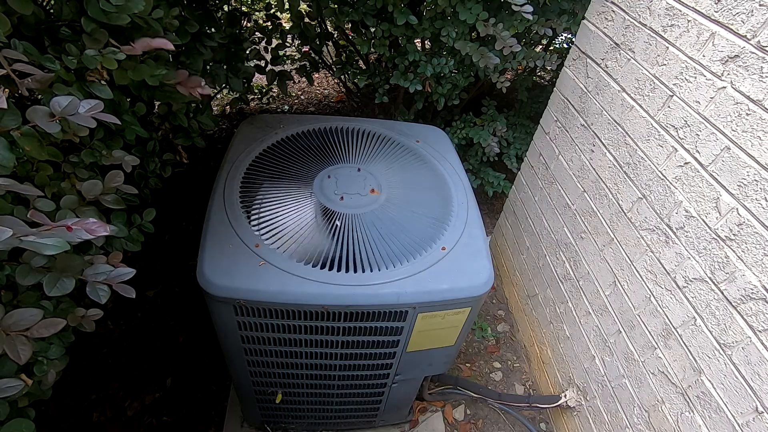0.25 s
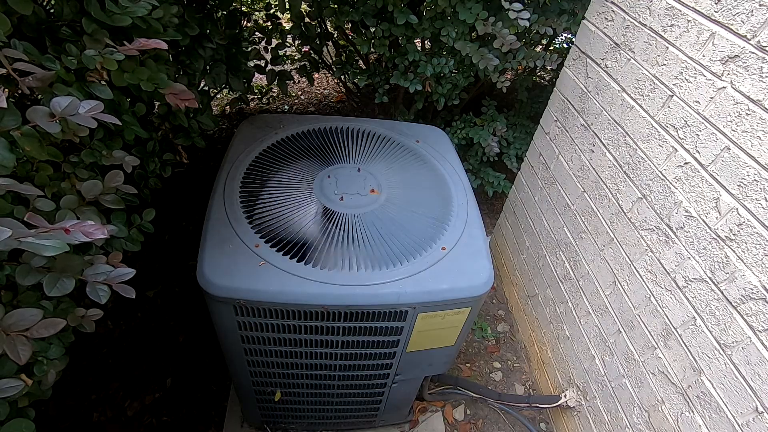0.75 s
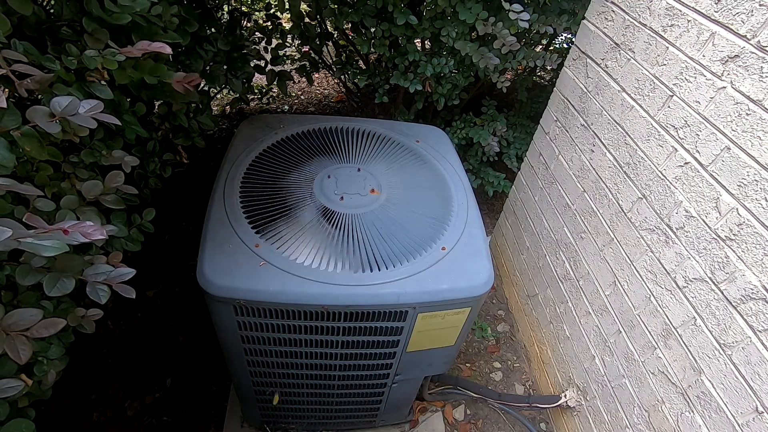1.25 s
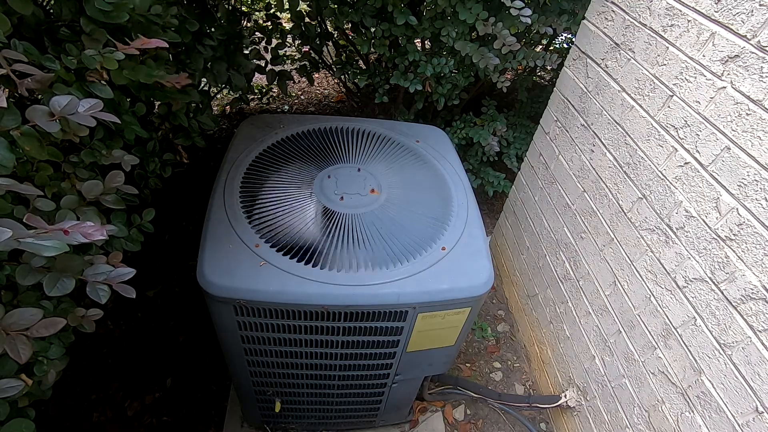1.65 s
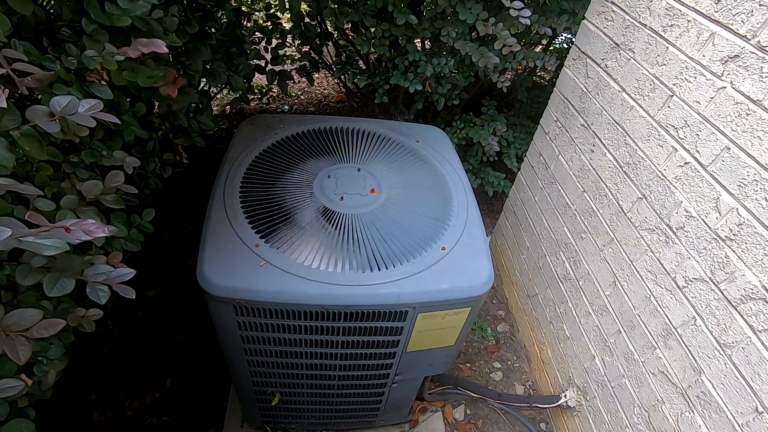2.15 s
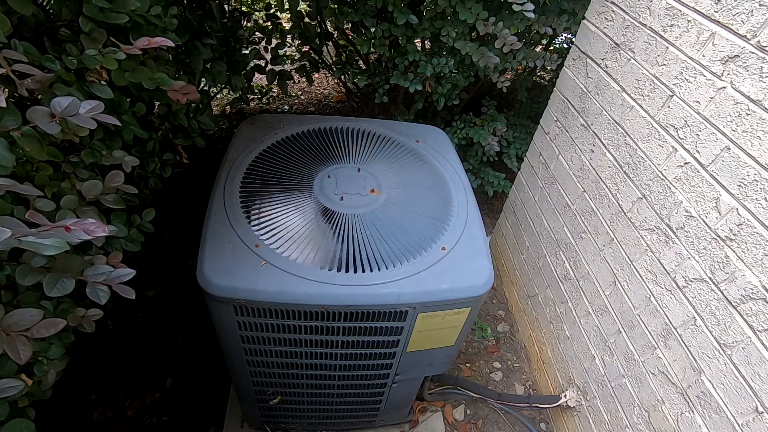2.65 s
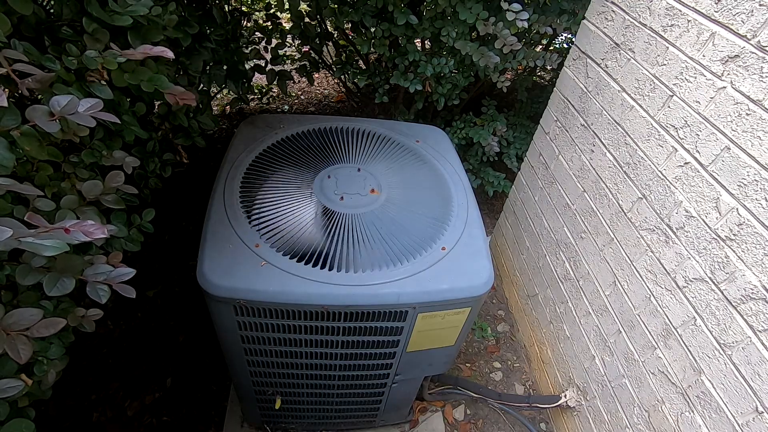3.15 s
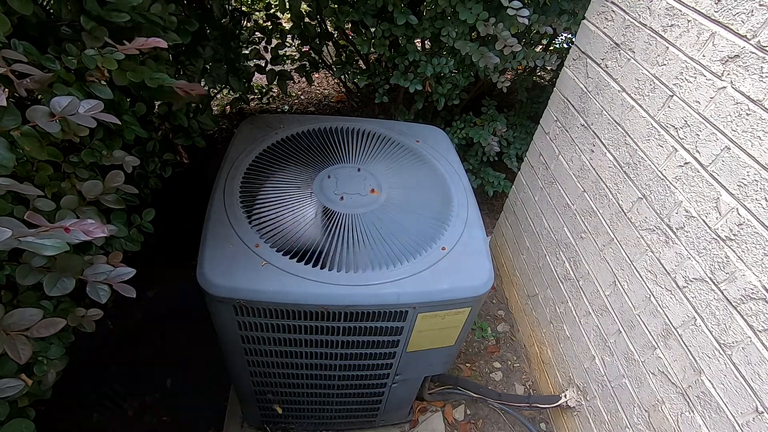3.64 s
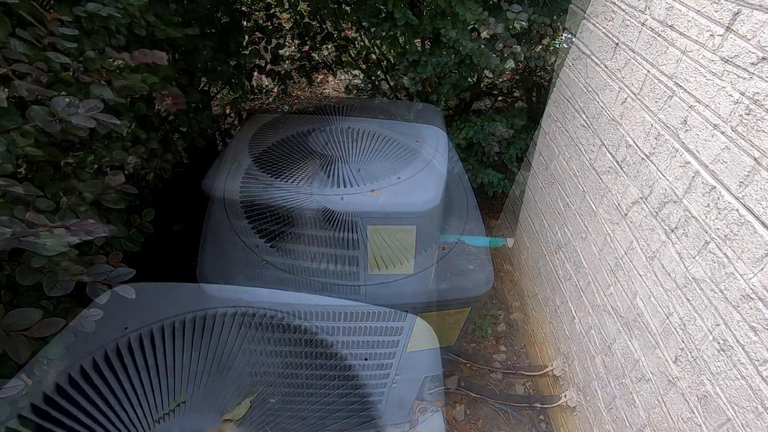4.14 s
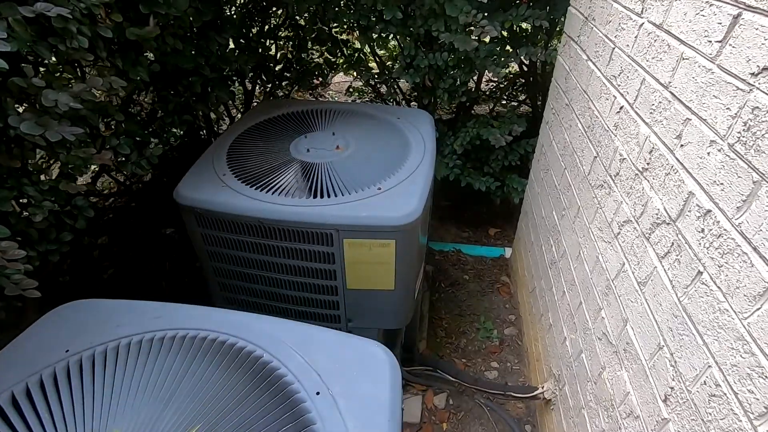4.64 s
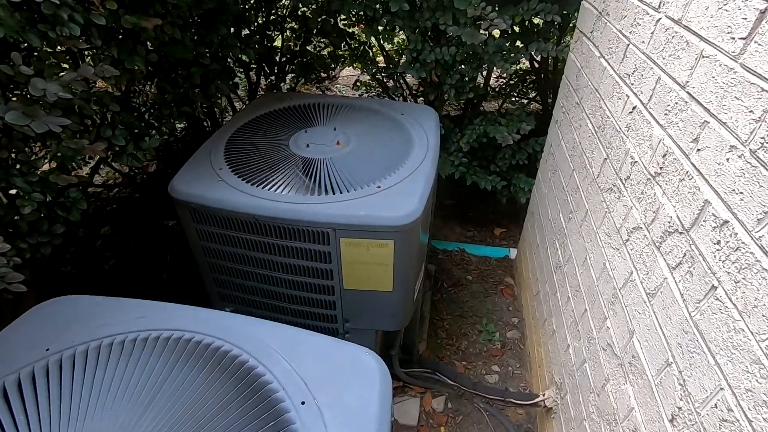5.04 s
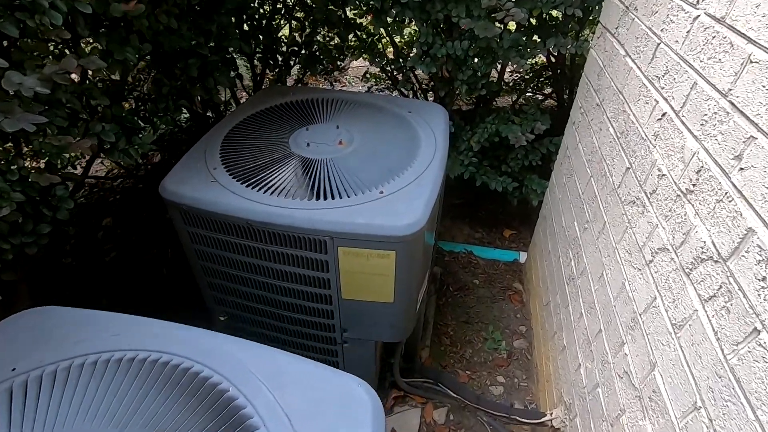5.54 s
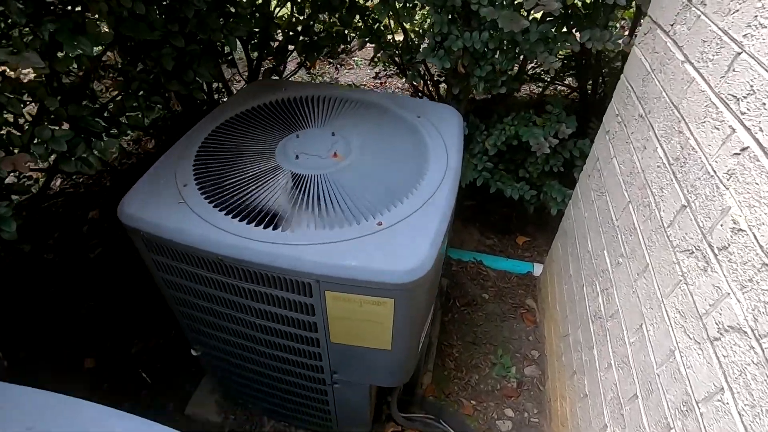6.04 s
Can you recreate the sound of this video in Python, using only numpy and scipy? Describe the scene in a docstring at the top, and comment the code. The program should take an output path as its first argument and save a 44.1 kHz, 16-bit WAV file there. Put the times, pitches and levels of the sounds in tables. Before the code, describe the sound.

Outdoors beside a brick wall, a heat pump runs continuously: deep pulsing compressor hum, fluttering fan tones and broad air rush in stereo, with low distant traffic drone. After about four seconds a louder, boomier mono view blends in and takes over, moving toward the unit while a foot briefly crackles through dry leaves.

```python
"""Outdoors by a brick wall, a heat pump runs: compressor orders and mains hum beat, fan tones and air rush around.
First a stereo microphone above the grille, with far traffic droning: sums of sines over shaped noise.
Then a boomier mono perspective blends in and takes over, its tones and rush shifting with place on a short
walk toward the unit, while a foot rustles through dry leaves: noise crackle, short snaps and a wide treble hiss."""
import sys
import numpy as np
from scipy import signal
from scipy.fft import rfft, irfft, next_fast_len
from scipy.io import wavfile
from scipy.ndimage import uniform_filter1d, map_coordinates

SR = 44100
rng = np.random.default_rng(int(sys.argv[2]) if len(sys.argv) > 2 else 0)


def to_wav(s):
    """Save 16-bit WAV."""
    ch = np.atleast_2d(s).T  # columns
    pcm = np.round(np.clip(ch, -1, 1) * 32767)  # PCM
    wavfile.write(sys.argv[1], SR, pcm.astype(np.int16))


N = 277389

SHAFT_HZ = 59.04  # compressor turns a second
HUM_HZ = 120.045  # magnetic pull, twice the mains
BLADE_HZ = 43.39  # blade passes a second
ABOVE_BEAT_S, WALK_BEAT_S = .4118, 5.097  # near these moments hum and second shaft order add up
HANDOVER_S = 4.606  # the microphone above the grille stops
TOP_HZ = 15757  # band limit
STEP = 64  # samples between the points of slow curves

# Compressor orders above the grille, before flutter and lean. Each row: multiple of the shaft rate, level in dB rms.
ABOVE_SHAFT = [(2, -27), (4, -41.5), (5, -37), (7, -44.5), (11, -49), (19, -47), (20, -44.5), (21, -51),
               (22, -50), (23, -47), (31, -48), (32, -48.5), (34, -48.5), (41, -55), (45, -54), (47, -48.5),
               (48, -52.5), (49, -46), (50, -47), (51, -52.5), (52, -54), (63, -57), (66, -62), (68, -57.1),
               (86, -58), (87, -59.5), (88, -65), (89, -59), (91, -55.5), (92, -58.5), (93, -61),
               (94, -59.5), (112, -63), (126, -62), (145, -63)]
# Fan tones above the grille, likewise. Each row: multiple of the blade rate, level in dB rms.
ABOVE_BLADE = [(1, -34), (2, -35), (3, -30.5), (4, -42), (6, -48), (7, -50), (8, -46), (9, -44), (10, -45),
               (11, -48)]
# Mains hum above the grille, likewise. Each row: multiple of the hum, level in dB rms.
ABOVE_HUM = [(1, -26.5), (2, -28.5), (6, -48.5)]
# Colour of the air rush above the grille. Each row: frequency in Hz, relative density in dB per Hz.
ABOVE_AIR = [(25, -1), (65, 5.5), (105, 1), (155, 1), (205, 5), (250, -4), (330, -4), (450, -3.5),
             (530, -5), (680, -4), (1500, -9), (1900, -9.5), (2500, -14), (4500, -21.5), (9300, -23.5),
             (11000, -39.5), (15700, -44.5)]
# Sheet-metal resonances of the cabinet. Each row: centre in Hz, width in Hz, gain in dB.
CABINET_RESONANCES = [(3020, 540, 3.5), (5200, 510, 1), (7800, 960, 2), (14200, 1200, 4)]
# Likeness of the rush at left and right. Each row: frequency in Hz, correlation from -1 to 1.
LIKENESS = [(60, .998), (110, 0.97), (200, 0.92), (380, 1), (700, 0.67), (1290, 0.4), (2380, 0.74),
            (4400, 0.59), (8120, -0.21), (15000, 0.14)]
# Lean of the stereo picture. Each row: frequency in Hz, left minus right in dB.
LEAN = [(60, 0), (130, .5), (270, 2.5), (500, .5), (1300, -2), (3100, -1), (5700, 0), (7200, -3), (8700, 1),
        (10200, 8.5), (11500, -0.5), (15000, 1)]
# Far engines swelling up, before a small waver.
# Each row: peak in seconds, half length in seconds, pitch in Hz, glide in Hz per second, peak level in dB rms.
SWELLS = [(0.15, 0.3, 55, 7, -24), (.55, 0.148, 58.6, 0, -27), (0.13, 0.25, 88, 9, -25.5),
          (.7, 0.22, 92, -2.5, -35), (.47, 0.301, 188, 3, -29), (.15, .4, 211, 4.5, -25),
          (1.2, .3, 211, -1.5, -32.5), (3.7, .35, 204, -4, -28)]
# One long engine drone, slowing overall. Each row: time in seconds, pitch in Hz, level in dB rms before a waver.
DRONE = [(.6, 78, -56), (1, 77, -29), (1.8, 77.4, -31), (2.4, 76.9, -38), (2.9, 75, -28), (3.1, 72, -37),
         (3.75, 73.6, -28), (4.1, 69.5, -44), (4.6, 69, -43)]
# Moments at three places along the walk, in seconds.
PLACES_S = [4.89, 5.34, 5.96]
# Compressor orders on the walk, before flutter. Each row: multiple of the shaft rate, dB rms at each of three places.
WALK_SHAFT = [(1, -34, -38, -38), (2, -16, -17, -16), (3, -40, -26.5, -26.5), (4, -43, -29.5, -33),
              (5, -35.5, -30.5, -27), (6, -48, -29.5, -38), (8, -38.5, -45, -40), (9, -38, -37, -36),
              (11, -39, -50, -52), (18, -43, -46, -43.5), (20, -47, -37, -46), (21, -37, -43, -46),
              (22, -60, -46, -61), (36, -54, -49, -47), (46, -66, -65, -57), (48, -57, -53, -65),
              (51, -51, -63, -59), (89, -64, -60, -66), (94, -61, -65, -64), (95, -66, -65, -64)]
# Fan tones on the walk, likewise. Each row: multiple of the blade rate, dB rms at each of three places.
WALK_BLADE = [(1, -25.5, -25, -25), (2, -33, -25.5, -27), (3, -27, -26, -25.5), (4, -25.5, -28, -33),
              (5, -28.5, -30.5, -42), (6, -48, -36, -57), (7, -55, -36, -38), (8, -36.5, -40, -40.5)]
# Mains hum on the walk, likewise. Each row: multiple of the hum, dB rms at each of three places.
WALK_HUM = [(1, -19, -16, -18), (2, -21, -30.5, -27.5), (12, -66, -44, -46.5)]
# Colour of the rush on the walk. Each row: frequency in Hz, relative density in dB per Hz at each of three places.
WALK_AIR = [(25, 2, 2, -4), (61, 9, 2, 10), (140, 10, 11, 11), (260, 2, -1, 2.5), (436, -3.5, -3.5, -3.5),
            (550, -1, -2, 2), (770, -2, 5, -0.5), (910, -6, -7, -3), (1205, -1.5, -2.5, -8),
            (1390, -7, -10, -4), (1510, -5, -8.5, -7), (2080, -12, -11, -14), (2960, -15.5, -16, -16),
            (5430, -25.5, -26, -24.5), (5930, -33, -32, -34.5), (8300, -35, -38, -35),
            (12000, -52.5, -52, -51), (15700, -83, -66, -59)]
# Shoe scuffing through leaves. Each row: start in seconds, hold in seconds, level in dB rms.
SCUFFS = [(4.957, .012, -30.5), (4.99, 0.024, -34), (5.04, .05, -39.5), (5.103, 0.0074, -34),
          (5.147, 0.061, -33), (5.275, .068, -38), (5.39, .17, -46.5), (5.61, .02, -46)]
# Colour of the leaf crackle. Each row: frequency in Hz, relative density in dB per Hz.
LEAF_COLOUR = [(1470, -21), (2500, 0), (3120, 0), (3450, -4.5), (4370, -8), (5100, -5), (7090, -10),
               (7890, -5.5), (15600, -39)]
# Single leaves breaking. Each row: start in seconds, level in dB before attack and dulling, pitch in Hz,
# time to fall 60 dB in seconds.
SNAPS = [(4.918, -32, 5000, .006), (4.9595, -20, 3600, .035), (4.9605, -25, 8500, .01),
         (4.992, -21, 3400, .012), (5.011, -27, 7000, .008), (5.103, -27, 8300, .01),
         (5.144, -24, 8800, .01), (5.161, -28, 8500, .015), (5.178, -22, 6500, .004),
         (5.205, -27, 7000, .008), (5.217, -28, 9000, .005), (5.248, -32, 10500, .006),
         (5.274, -27, 5500, .012), (5.316, -29, 6000, .006), (5.340, -23, 7000, .005),
         (5.621, -27, 5200, .01), (6.259, -31, 8000, .008)]

AIR_DB = -24.5  # rush above the grille, before bass changes, blade swell and lean
BASS_START_DB, BASS_DIP_DB = 2, -1.5  # the bass starts full and dips once
BASS_DIP_S, BASS_DIP_LONG_S = 0.98, .5
SWELL_EDGE_DB, SWELL_SAG = 8.5, .012  # loss of level and share of pitch half a length from the peak
TONES_IN_S, TONES_RISE_S = 3.954, 0.66  # walking tones fade in evenly
RUSH_IN_S, RUSH_RISE_S, RUSH_FULL_S = 4.13, 0.026, 4.5  # walking rush comes in fast, then grows
RUSH_IN_DB, RUSH_DB = -21.5, -20.5
SCUFF_RISE_DB_PER_S, SCUFF_FALL_DB_PER_S = 550, 280
HISS_UNDER_DB, HISS_STAYS_DB = -21, -62  # level relative to the scuffs, and the dB rms that lingers
HISS_FROM_S, HISS_RISE_S = 4.9, .1


def amp(db):
    """Amplitude of a level in dB."""
    return np.exp(np.asarray(db) * (np.log(10) / 20))


def unit_rms(x):
    """The sound scaled to an rms of 1."""
    return x / np.sqrt(np.mean(x ** 2) + 1e-20)


def along(points, hz):
    """Interpolate (Hz, value) points on a log frequency axis."""
    f, v = np.transpose(points)
    return np.interp(np.log(hz + 1), np.log(f + 1), v)


def curves(rows):
    """One value per sample for each column after the time."""
    s, *cols = np.transpose(rows)
    return [np.interp(np.arange(N) / SR, s, c) for c in cols]


def ramp(start_s, rise_s):
    """0 before start_s, 1 from rise_s later."""
    return np.clip((np.arange(N) / SR - start_s) / rise_s, 0, 1)


def slow(rate):
    """A smooth random curve, rate knots a second, one point each STEP."""
    knots = rng.standard_normal(int(N * rate / SR) + 4)
    return map_coordinates(knots, [np.arange(0, N + STEP, STEP) * rate / SR])


def fine(points):
    """A slow curve at every sample."""
    return np.interp(np.arange(N), np.arange(len(points)) * STEP, points)


def wobble(rate):
    """A smooth random curve at every sample."""
    return fine(slow(rate))


def filtered(x, response):
    """x times a response of frequency."""
    m = next_fast_len(N + SR // 4)
    return irfft(rfft(x, m) * response(np.fft.rfftfreq(m, 1 / SR)), m)[..., :N]


def patchy(channels, patchy_db):
    """White noise with patches of random gain in time and frequency."""
    z = signal.stft(rng.standard_normal((channels, N)), nperseg=512)[2]
    field = uniform_filter1d(rng.standard_normal(z.shape[1:]), size=6, axis=0)
    field = uniform_filter1d(field, size=12, axis=1)
    return signal.istft(z * amp(patchy_db * unit_rms(field)), nperseg=512)[1][:, :N]


def orders(rows, base_hz, times, beat_s, locked, slip, flutter_db):
    """Sines on multiples of a rotation; high orders wander more. The locked one peaks near beat_s."""
    turn = 2 * np.pi * base_hz * (np.arange(N) / SR - beat_s) + slip * wobble(3)  # radians
    t = np.arange(0, N + STEP, STEP) / SR
    out = 0
    for k, *levels in rows:
        start = rng.uniform(0, 2 * np.pi) * (k != locked)
        flutter = 0.85 * slow(1.786) + 0.79 * slow(9)
        db = np.interp(t, times, levels) + flutter_db * np.tanh(k * base_hz / 700) * flutter
        out = out + fine(np.sqrt(2) * amp(db)) * np.cos(k * turn + start)
    return out


def machine_tones(shaft, blade, hum, times, beat_s, slip, flutter_db):
    """The rotor slips behind the mains, so its second order beats about twice a second with the hum."""
    shaft_tones = orders(shaft, SHAFT_HZ, times, beat_s, 2, slip, flutter_db)
    hum_tones = orders(hum, HUM_HZ, times, beat_s, 1, slip=0.024, flutter_db=.3)
    fan_tones = orders(blade, BLADE_HZ, times, beat_s, None, slip=0.068, flutter_db=5.5)
    return shaft_tones + hum_tones + fan_tones


def cabinet(hz):
    """Gain of the sheet-metal resonances."""
    return amp(sum(db * np.exp(-((hz - c) / w) ** 2) for c, w, db in CABINET_RESONANCES))


def blade_gate(depth):
    """The rush swells at each blade pass."""
    return 1 + depth * np.cos(2 * np.pi * BLADE_HZ * np.arange(N) / SR + 0.4 * wobble(4.9))


def air_above():
    """Air rush at the grille: noise alike in the bass at both microphones, less so in the treble."""
    t = np.arange(N) / SR

    def mid_side_shape(hz):
        angle = np.arccos(np.clip(along(LIKENESS, hz), -1, 1)) / 2  # splits power to set the likeness
        return amp(along(ABOVE_AIR, hz)) * cabinet(hz) * [np.cos(angle), np.sin(angle)]

    mid, side = filtered(patchy(2, patchy_db=0.92), mid_side_shape)
    air = unit_rms(np.array([mid + side, mid - side]))
    bass = filtered(air, lambda hz: 1 / (1 + (hz / 230) ** 6))
    hiss = filtered(air, lambda hz: 1 / (1 + (500 / (hz + 1)) ** 6))
    bass_db = BASS_START_DB * np.exp(-t / BASS_DIP_LONG_S)
    bass_db = bass_db + BASS_DIP_DB * np.exp(-((t - BASS_DIP_S) / BASS_DIP_LONG_S) ** 2)
    air = air + (amp(bass_db) - 1) * bass + (blade_gate(depth=0.042) - 1) * hiss
    return amp(AIR_DB) * air


def valve_buzz():
    """One random pattern repeated each compressor turn: a weak comb of high orders."""
    turn = SHAFT_HZ * np.arange(N) / SR + .0006 * wobble(3)
    cycle = rng.standard_normal(600)
    buzz = map_coordinates(cycle, [turn % 1 * len(cycle)], mode="grid-wrap")
    shape = lambda hz: amp(along(ABOVE_AIR, hz)) * cabinet(hz) / (1 + (3300 / (hz + 1)) ** 8)
    return unit_rms(filtered(buzz, shape)) * amp(1.6 * wobble(2.84))


def traffic():
    """Far engines: unsteady low sines; each swell glides, its pitch sagging away from the peak."""
    t = np.arange(N) / SR
    tracks = [curves([(0, DRONE[0][1], -120)] + DRONE)]
    for s, half_s, hz, glide, db in SWELLS:
        away = np.clip((t - s) / half_s, -4, 4)  # in half lengths
        pitch = hz * (1 - SWELL_SAG * away ** 2) + glide * half_s * away
        tracks.append((pitch, db - SWELL_EDGE_DB * away ** 2))
    out = 0
    for hz, db in tracks:
        level = np.sqrt(2) * amp(db + 1.3 * wobble(10))
        out = out + level * np.cos(2 * np.pi * np.cumsum(hz) / SR + 0.26 * wobble(13))
    return out


def above():
    """Stereo above the grille: tones, traffic, buzz and rush, leaning left or right by frequency."""
    tones = machine_tones(ABOVE_SHAFT, ABOVE_BLADE, ABOVE_HUM, [0], ABOVE_BEAT_S,
                          slip=0.012, flutter_db=2.5)
    tones = tones + traffic() + amp(-54.0) * valve_buzz()
    both = filtered(tones + air_above(), lambda hz: amp(along(LEAN, hz) * [[.5], [-.5]]))
    return both * np.clip((HANDOVER_S - np.arange(N) / SR) / .0003, 0, 1)


def walking_rush():
    """Mono air rush: its colour shifts as the distance to unit and wall changes."""
    hz, *place_db = np.transpose(WALK_AIR)
    noise = patchy(1, patchy_db=1.5)[0]
    air = np.zeros(N)
    for db, share in zip(place_db, np.eye(len(PLACES_S))):
        near = np.interp(np.arange(N) / SR, PLACES_S, share)  # crossfade between places
        air += near * filtered(noise, lambda f: amp(along(np.transpose([hz, db]), f)))
    rush_db = RUSH_IN_DB + (RUSH_DB - RUSH_IN_DB) * ramp(RUSH_IN_S, RUSH_FULL_S - RUSH_IN_S)
    return ramp(RUSH_IN_S, RUSH_RISE_S) * amp(rush_db) * unit_rms(air) * blade_gate(depth=0.094)


def walk():
    """Mono on the walk: machine tones fade in, then the rush, then leaves underfoot."""
    tones = machine_tones(WALK_SHAFT, WALK_BLADE, WALK_HUM, PLACES_S, WALK_BEAT_S,
                          slip=0.043, flutter_db=4.0)
    return ramp(TONES_IN_S, TONES_RISE_S) * tones + walking_rush() + leaves()


def scuffing():
    """Strength of the shoe in the leaves: quick rise, hold, slower fall."""
    t = np.arange(N) / SR
    power = 0
    for s, hold_s, db in SCUFFS:
        rise_db = SCUFF_RISE_DB_PER_S * np.maximum(s - t, 0)
        fall_db = SCUFF_FALL_DB_PER_S * np.maximum(t - s - hold_s, 0)
        power = power + amp(db - rise_db - fall_db) ** 2
    return np.sqrt(power)


def leaf_snaps():
    """Leaves breaking: short decaying sines with randomly drifting phase, dulled in the treble."""
    snaps = np.zeros(N + SR)
    t = np.arange(SR // 50) / SR
    for s, peak_db, hz, t60 in SNAPS:
        burst = np.sin(2 * np.pi * hz * t + np.cumsum(.55 * rng.standard_normal(len(t))))
        burst = amp(peak_db - 60 * t / t60) * burst * np.clip(t / .0004, 0, 1)
        snaps[round(s * SR):][:len(t)] += burst
    return filtered(snaps[:N], lambda hz: 1 / (1 + (hz / 10500) ** 6))


def leaves():
    """Crackle under the step: noise of rapidly wavering strength, with single snaps on top."""
    spikes = rng.standard_normal(N) * amp(2.4 * wobble(600) + 1.1 * wobble(45))
    crackle = unit_rms(filtered(spikes, lambda hz: amp(along(LEAF_COLOUR, hz))))
    return leaf_snaps() + scuffing() * crackle


def wide_hiss():
    """A faint hiss above about 11 kHz, unrelated left and right, rises with the scuffs and lingers."""
    hiss = filtered(rng.standard_normal((2, N)), lambda hz: 1 / (1 + (11000 / (hz + 1)) ** 12))
    level = amp(HISS_UNDER_DB) * scuffing() + amp(HISS_STAYS_DB) * ramp(HISS_FROM_S, HISS_RISE_S)
    return unit_rms(hiss) * level


def scene():
    """Both perspectives overlap until the handover; the wide hiss joins the leaves."""
    return above() + walk() + wide_hiss()


def record(dry):
    """Nothing above the band limit."""
    return filtered(dry, lambda hz: hz < TOP_HZ)


dry = scene()
out = record(dry)
to_wav(out)
```